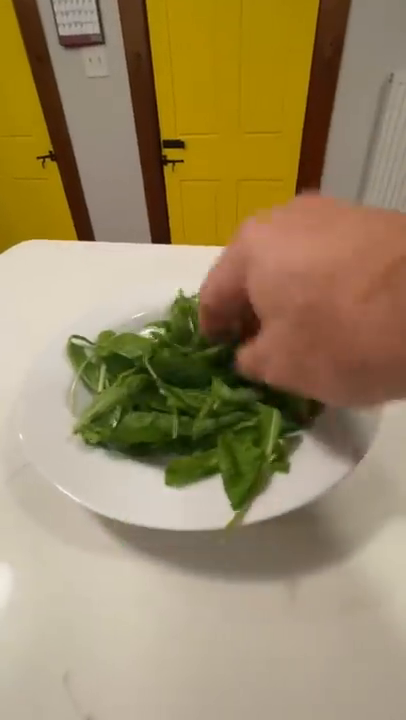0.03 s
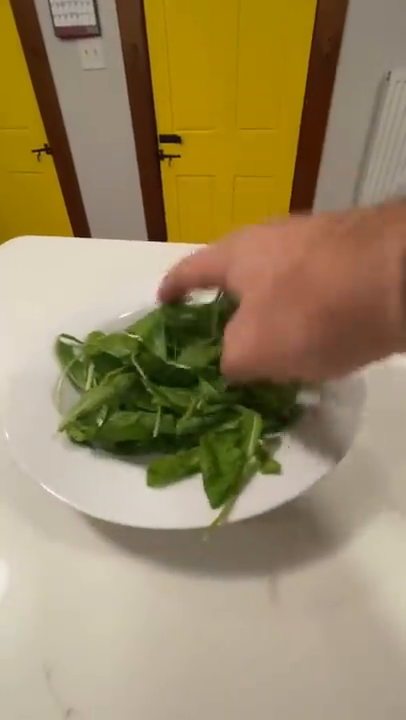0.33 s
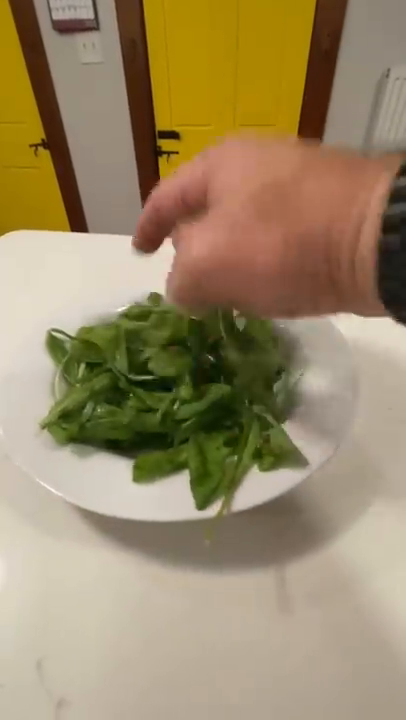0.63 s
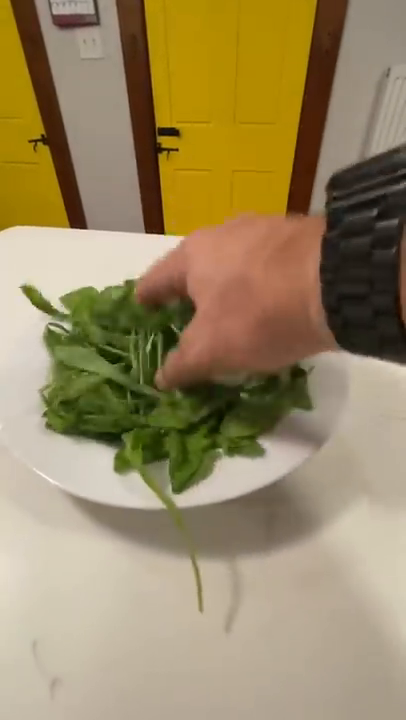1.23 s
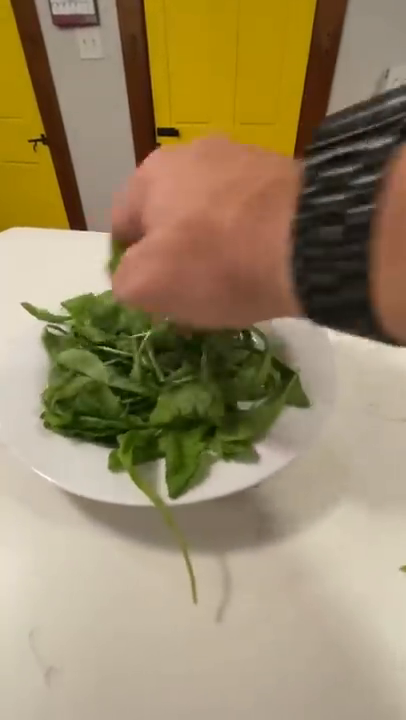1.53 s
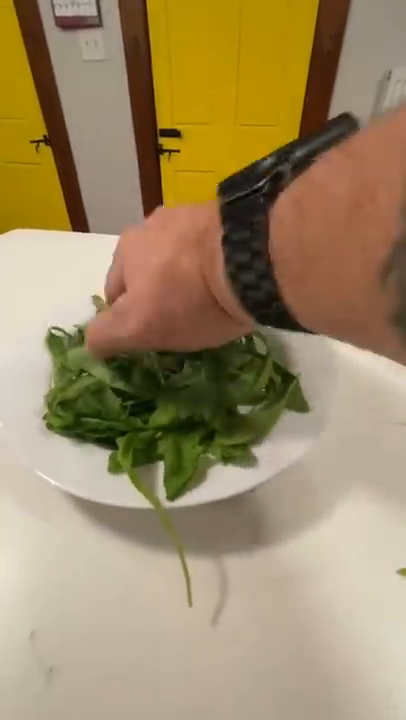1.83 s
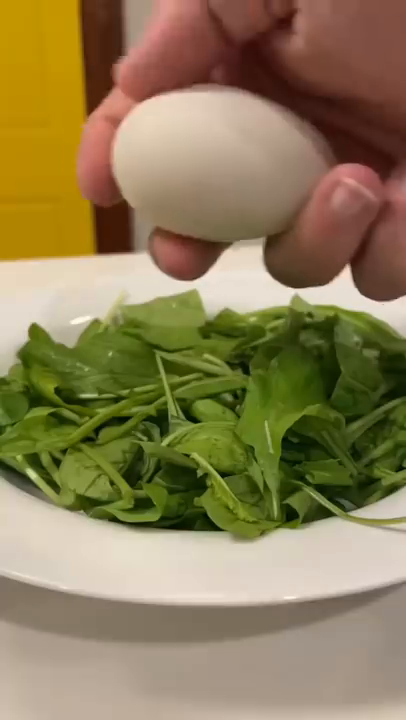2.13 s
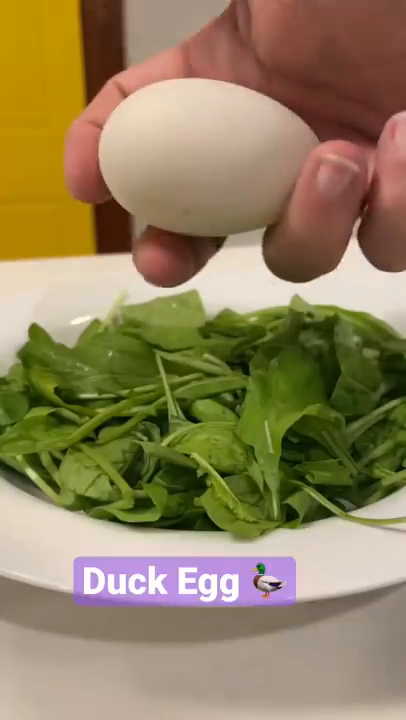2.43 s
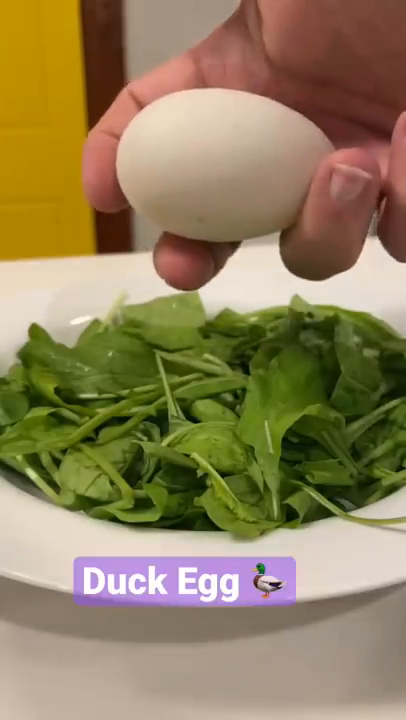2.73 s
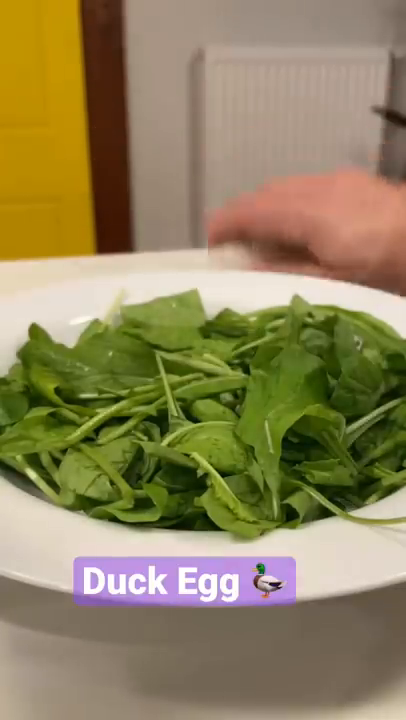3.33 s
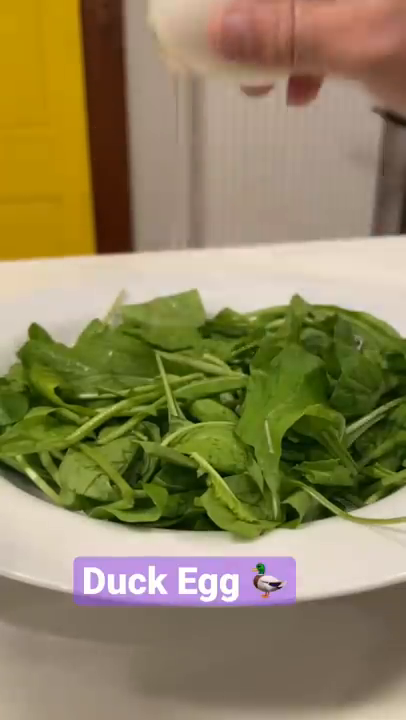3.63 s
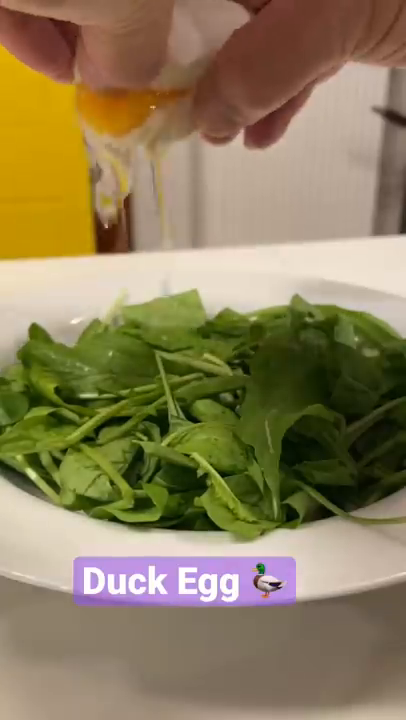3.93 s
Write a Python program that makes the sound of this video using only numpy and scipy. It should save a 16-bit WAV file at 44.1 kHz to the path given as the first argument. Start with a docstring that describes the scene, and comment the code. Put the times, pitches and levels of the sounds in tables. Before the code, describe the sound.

An egg is knocked twice on a table and its shell crackles open. Before that, salad leaves rustle softly and a china plate clinks faintly. Heard close up in a small, quiet room with a low hum.

```python
"""Two close scenes in a small, hard-walled, quiet room with a low hum. First a hand arranges salad leaves
on a china plate: they rustle in tiny slips, stalks snap, and the plate clinks twice. At 2.1 s the second
scene cuts in. An egg is knocked twice on the table top, each knock a crunch of shell, a tock of the egg
and a thump of the table. Then fingers pull the shell apart in a few crackles and the wet membrane pops."""
import sys
import numpy as np
from scipy import signal
from scipy.fft import rfft, irfft
from scipy.io import wavfile
from scipy.ndimage import uniform_filter1d

SR = 44100
rng = np.random.default_rng(int(sys.argv[2]) if len(sys.argv) > 2 else 0)


def generate_wav(signal):
    """Clip the signal to [-1, 1] and save it as 16-bit WAV at the path in sys.argv[1]."""
    frames = np.transpose(np.atleast_2d(signal))
    scaled = np.clip(frames, -1, 1) * 32767
    pcm = np.round(scaled).astype(np.int16)
    wavfile.write(sys.argv[1], SR, pcm)


N = 176400
CUT_S = 2.105  # the leaf scene ends abruptly here
SHELL_LOW_CUT_HZ = 255

# stereo width of the room: f/Hz, side against mid/dB
ROOM_WIDTH = [(70, -11.5), (200, -20), (400, -7.5), (700, 0.5), (1300, 0.5), (2400, -7), (4400, 0),
              (14000, -10.5)]
# egg meeting the table: t/s, thump level/dB, thump tilt/(dB/octave), crunch level/dB, crunch decay/s
KNOCKS = [(3.0767, -19, 0.5, -6, 0.0021), (3.2990, -17.5, 0.5, -7, 0.0021)]


def undb(db):
    """Decibels to gain."""
    return 10 ** (np.asarray(db) / 20)


def unit(x):
    """Scale to rms 1."""
    return x / np.sqrt(np.mean(x ** 2))


def over_hz(points, size=N):
    """Read a curve of (f/Hz, value) points at the bins of a transform of this size."""
    hz, value = np.array(sorted(points)).T
    return np.interp(np.log(np.arange(size // 2 + 1) * SR / size + 1), np.log(hz), value)


def band(spectrum, hz, centres):
    """The sound in the band around hz, crossfading into the neighbouring centres."""
    return irfft(spectrum * over_hz([(f, float(f == hz)) for f in centres]), N)


def colour(x, points):
    """Minimum-phase EQ of unit power with the given (f/Hz, level/dB) shape."""
    size = 2 * N
    cepstrum = irfft(np.log(unit(undb(over_hz(points, size)))))
    cepstrum[1:N] *= 2
    cepstrum[N + 1:] = 0
    return irfft(rfft(x, size) * np.exp(rfft(cepstrum)))[..., :N]


def high_pass(x, hz, order):
    """Roll off the lows below hz."""
    return signal.sosfilt(signal.butter(order, hz, "high", fs=SR, output="sos"), x)


def wander(per_s):
    """A slow modulator: random values joined by straight lines."""
    hold = max(int(SR / per_s), 1)
    return uniform_filter1d(rng.standard_normal(N)[np.arange(N) // hold], hold)


def grains(per_s, scatter_db):
    """Random tiny clicks, mostly small and a few large; rms 1."""
    clicks = (rng.random(N) < per_s / SR) * rng.choice([-1, 1], N)
    return unit(clicks * undb(scatter_db * np.minimum(rng.exponential(size=N), 6)))


def fractures(t, at, rise_s, decay_s):
    """A run of tiny breaks that swells and dies within milliseconds, spread evenly over frequency."""
    envelope = np.exp(-np.maximum((at - t) / rise_s, (t - at) / decay_s).clip(0, 60))
    spectrum = rfft(envelope * grains(per_s=22000, scatter_db=2))
    power = uniform_filter1d(np.abs(spectrum) ** 2, int(120 * N / SR))  # smoothed over 120 Hz
    burst = irfft(spectrum / np.sqrt(np.abs(power) + 1e-18), N) * envelope ** .1
    return .5 * burst * np.sqrt(np.sum(envelope ** 2) / (np.sum(burst ** 2) + 1e-18))


def ring(t, at, modes, tilt_db=0, pivot_hz=1000):
    """Decaying modes struck at one moment; a softer touch tilts them down, in dB per octave."""
    age = np.maximum(t - at, 0)
    return sum(undb(db + tilt_db * np.log2(hz / pivot_hz)) * np.sin(2 * np.pi * hz * age)
               * np.exp(-np.log(1000) * age / t60) for hz, db, t60 in modes)


def attack(t, at, contact_s):
    """A ring builds up for as long as the contact pushes."""
    return np.clip((t - at) / contact_s, 0, 1)


def room_response(t):
    """Reverb of the hard walls, as mid and side; each band dies at its own rate."""
    # decay of the room: f/Hz, t60/s
    decays = [(100, 1), (400, 0.58), (1200, 0.45), (3000, 0.63), (7000, 0.5), (14000, 0.35)]
    predelay_s, build_s = .0023, .0015
    centres = [hz for hz, _ in decays]
    noise = rfft(rng.standard_normal((2, N)))
    noise[1] *= undb(over_hz(ROOM_WIDTH))
    tail = sum(band(noise, hz, centres) * np.exp(-np.log(1000) * t / t60) for hz, t60 in decays)
    tail *= np.clip((t - predelay_s) / build_s, 0, 1)
    return tail / np.sqrt(np.sum(tail[0] ** 2))


def in_room(x, room, wet_db):
    """A centred sound and its reverb, as mid and side."""
    return np.array([x, 0 * x]) + undb(wet_db) * signal.fftconvolve(x[None], room, axes=1)[:, :N]


def room_tone(t, shape, noise_db, hum):
    """A bed of low steady noise and hum that reaches the left first, as mid and side."""
    lead_s, side_db = .00033, 1
    mid, side = colour(rng.standard_normal((2, N)), shape) * undb(noise_db)
    mid = mid + sum(np.sqrt(2) * undb(db) * np.sin(2 * np.pi * (hz * t + rng.random())) for hz, db in hum)
    left_lead = (np.interp(t + lead_s / 2, t, mid) - np.interp(t - lead_s / 2, t, mid)) / 2
    diffuse = irfft(rfft(side) * undb(side_db + over_hz(ROOM_WIDTH)), N)
    return np.array([mid, left_lead + diffuse])


def shifting_rub(x):
    """Each quarter octave swells and fades alone, as different leaves take up the rubbing."""
    depth_db = 3.2
    centres, spectrum = 1000 * 2 ** (np.arange(16) / 4), rfft(x)
    return sum(band(spectrum, hz, centres) * undb(depth_db * wander(per_s=35)) for hz in centres)


def stalk_snaps(t):
    """Single stalks break, each with a short bright tick."""
    # snaps: t/s, level/dB
    snaps = [(0.275, -39.5), (0.343, -47), (.652, -50), (1.131, -46), (1.611, -51), (1.854, -56),
             (2.026, -55)]
    # tone of a snap: f/Hz, relative level/dB
    snap_eq = [(1000, -26), (5000, -9), (9000, 0), (13000, 0), (16000, -9)]
    return colour(sum(undb(db) * fractures(t, at, rise_s=.0002, decay_s=.0008) for at, db in snaps), snap_eq)


def leaves(t, room):
    """Leaves slide over each other in dense slips and crisper crinkles, and stalks snap; mid and side."""
    # the hand working in the leaves: t/s, relative level/dB
    gesture = [(0.0, -53.5), (0.03, -49.5), (0.2, -66.5), (0.21, -62), (0.26, -67), (0.28, -68),
               (0.28, -69), (0.33, -77), (0.35, -56.5), (0.44, -45), (0.6, -73.5), (0.69, -69), (0.7, -60),
               (0.76, -59.5), (0.83, -52.5), (0.85, -45), (0.94, -56), (1.04, -56.5), (1.07, -62.5),
               (1.12, -58.5), (1.13, -51), (1.21, -63.5), (1.29, -54), (1.3, -59.5), (1.37, -55),
               (1.47, -69.5), (1.74, -68.5), (1.82, -55), (1.89, -52.5), (1.93, -69), (2.01, -76),
               (2.05, -51), (2.09, -62)]
    # tone of the rustle: f/Hz, relative level/dB
    leaf_eq = [(400, -4), (750, -4.5), (1100, -7), (1500, -13.5), (2100, -8.5), (2900, -12), (3700, -7.5),
               (5400, -10), (6600, -3), (7500, -8.5), (9000, 1.5), (10500, -3), (12500, -6.5), (13800, -16),
               (14700, -26), (16000, -39)]
    # stereo width of the rustle: f/Hz, side against mid/dB
    width = [(1000, 3), (2100, 5), (3200, 6), (7000, -12), (11000, -59), (14000, -41)]
    gain_db, flutter_db, crinkle_db = 2, .7, -12
    effort = undb(gain_db + np.interp(t, *np.array(gesture).T) + flutter_db * wander(per_s=48))
    slips = np.array([grains(per_s=14000, scatter_db=3) + undb(crinkle_db) * grains(per_s=160, scatter_db=3)
                      for _ in range(2)])
    mid, side = colour(effort * shifting_rub(slips), leaf_eq)
    rustle = in_room(mid + stalk_snaps(t), room, wet_db=-6.5)
    rustle[1] += irfft(rfft(side) * undb(over_hz(width)), N)
    return rustle


def plate_clinks(t):
    """The china rings when touched: dull the first time, bright the second."""
    # modes of the plate: f/Hz, relative level/dB, t60/s
    modes = [(2040, 0, .25), (2085, -8, .09), (3375, 2, .12), (3440, -8, .07), (4533, -3, .28),
             (5190, -4, .05), (5556, -9, .36), (6342, -12, .2), (6616, 1, .08)]
    # touches on the plate: t/s, level/dB, tilt/(dB/octave)
    touches = [(.408, -48, -9), (1.131, -44.5, 1.5), (1.146, -74, 3)]
    return sum(undb(db) * ring(t, at, modes, tilt, pivot_hz=modes[0][0]) * attack(t, at, contact_s=.0007)
               for at, db, tilt in touches)


def table_thumps(t):
    """The table top takes each blow and rings low."""
    # modes of the table top: f/Hz, relative level/dB, t60/s
    modes = [(69.3, -18, 0.62), (84.5, -8.5, 0.22), (162.4, -10.5, 0.17), (192, 3, 0.05),
             (218.7, -22, 0.47), (247.5, -15.5, 0.3), (310, -16.5, 0.21), (415, -20, 0.15), (678, -29, 0.3),
             (1460, -25, 0.2)]
    late = t - .0019  # the shell caves in before the egg's weight meets the table
    return sum(undb(db) * ring(late, at, modes, tilt, pivot_hz=200) * attack(late, at, contact_s=.0025)
               for at, db, tilt, _, _ in KNOCKS)


def egg_tocks(t):
    """The egg rings briefly at each knock: whole it tocks hollowly, dented it thuds and rattles."""
    # modes of the whole egg, then of the dented egg: f/Hz, level/dB, t60/s
    egg_modes = [
        [(660, -28.5, 0.081), (1015, -27.5, 0.027), (1360, -18.5, 0.042), (1773, -20.5, .019), (2020, -39, .08),
         (2885, -41, 0.29)],
        [(375, -26.5, 0.037), (420, -25.5, 0.041), (498, -25.5, 0.059), (1292, -25.5, 0.05), (1985, -25, 0.048),
         (2240, -20, 0.016), (3170, -32, 0.063), (3360, -24.5, 0.052), (3625, -17, 0.0275)],
    ]
    return sum(ring(t, at, modes) * attack(t, at, contact_s=.0006)
               for (at, *_), modes in zip(KNOCKS, egg_modes))


def shell_crunches(t):
    """The shell caves in where it meets the table."""
    # tone of the whole shell, then of the dented shell: f/Hz, relative level/dB
    crunch_eqs = [
        [(200, -5.5), (500, -7), (680, -4), (1100, -6), (1900, -5.5), (2400, -12), (2850, -16), (3600, -18),
         (4350, -22.5), (5300, -14), (7000, -15), (8700, -11.5), (10000, -32), (11600, -15), (13000, -20),
         (15000, -38), (16500, -40)],
        [(200, -4), (460, -1.5), (620, -17.5), (850, -4.5), (1300, -6.5), (1650, -6.5), (2200, -5),
         (2650, -7.5), (3300, -3), (3600, -8.5), (3950, -17.5), (4700, -17), (6400, -13.5), (8500, -15.5),
         (10000, -28.5), (12800, -13.5), (15000, -29), (16500, -46)],
    ]
    crunch = sum(colour(undb(db) * fractures(t, at, rise_s=.00042, decay_s=decay), eq)
                 for (at, _, _, db, decay), eq in zip(KNOCKS, crunch_eqs))
    return high_pass(crunch, SHELL_LOW_CUT_HZ, order=3)


def finger_squeeze(t):
    """Fingers work into the wet shell with a soft, grainy squelch."""
    # pressure of the fingers: t/s, level/dB
    gesture = [(3.72, -66), (3.78, -49.5), (3.86, -55.5), (3.95, -54.5), (4.0, -52)]
    # tone of the squelch: f/Hz, relative level/dB
    squelch_eq = [(59, 5.5), (100, 9.5), (962, -3), (2580, -24), (3110, -10.5), (8520, -21), (9660, -68),
                  (12400, -18), (15000, -43)]
    pressure = undb(np.interp(t, *np.array(gesture).T)) * (t > gesture[0][0])
    return colour(grains(per_s=1500, scatter_db=3.2) * pressure, squelch_eq)


def membrane_pops(t):
    """The wet membrane pops in tiny pitched blips."""
    # pops: t/s, level/dB, f/Hz
    pops = [(3.936, -47.5, 3200), (3.94, -53, 1550), (3.963, -49, 3500), (3.968, -50.5, 1930),
            (3.977, -51, 1370)]
    t60_s = .014
    return sum(ring(t, at, [(hz, db, t60_s)]) for at, db, hz in pops)


def shell_cracks(t):
    """The shell gives way under the fingers in short crackles that set the broken pieces ringing."""
    # one crack at each knock, then a run as the shell opens: t/s, level/dB, rise/s, decay/s
    cracks = [(3.07, -37, 0.0016, 0.0033), (3.292, -31, 0.00073, 0.00067), (3.743, -57, 0.0026, 0.018),
              (3.78, -27.5, 0.0022, 0.003), (3.7814, -18.5, 0.00041, 0.0012), (3.787, -31, 0.00063, 0.0023),
              (3.8053, -21, 0.000058, 0.0017), (3.82, -37, 0.00039, 0.0022),
              (3.8277, -15.5, 0.00033, 0.0018)]
    # tone of the splitting shell: f/Hz, relative level/dB
    shell_eq = [(200, -2), (500, -8.5), (800, 1.5), (1350, -14.5), (1900, -6), (3000, -8.5), (4300, -6.5),
                (5700, -13.5), (7000, -4), (9000, -1.5), (10500, 1), (12500, -9), (15200, -11.5),
                (16500, -34)]
    # resonances of the broken shell: f/Hz, width/Hz, gain/dB
    peaks = [(690, 80, -6), (2040, 120, -3), (4300, 470, 6), (5080, 310, 10), (6000, 250, 1)]
    bursts = sum(undb(db) * fractures(t, at, rise, decay) for at, db, rise, decay in cracks)
    crackle = colour(bursts, shell_eq)
    ringing = sum(undb(db) * signal.lfilter(*signal.iirpeak(hz, hz / width, fs=SR), crackle)
                  for hz, width, db in peaks)
    return high_pass(crackle + ringing, SHELL_LOW_CUT_HZ, order=3)


def scene():
    """The leaf scene cuts to the egg scene, each over its own room tone; left and right."""
    # room tone under the leaves: f/Hz, relative level/dB
    leaf_bed = [(30, -47), (45, 10), (87, -5.5), (120, 6), (150, -2), (250, 2), (500, -4.5), (720, -7.5),
                (1000, -13), (1500, -19.5), (3000, -27.5), (8000, -37.5), (16000, -49)]
    # room tone under the egg: f/Hz, relative level/dB
    egg_bed = [(30, -23), (45, -10), (70, -6), (90, -12), (130, -8), (250, -3), (400, -6), (600, -9),
               (850, -17), (1200, -28), (2700, -34), (4200, -43), (8000, -44), (13000, -44), (16000, -58)]
    # hum: f/Hz, level under the leaves/dB, level under the egg/dB
    hum_lines = [(56.3, -58, -61.5), (121.2, -61.5, -71)]
    t, hum = np.arange(N) / SR, np.array(hum_lines)
    room = room_response(t)
    salad = (leaves(t, room)
             + in_room(plate_clinks(t), room, wet_db=-12)
             + room_tone(t, leaf_bed, noise_db=-54, hum=hum[:, [0, 1]]))
    egg = (in_room(table_thumps(t), room, wet_db=-16)
           + in_room(shell_crunches(t), room, wet_db=-5)
           + in_room(egg_tocks(t), room, wet_db=-15)
           + in_room(shell_cracks(t) + finger_squeeze(t) + membrane_pops(t), room, wet_db=-14)
           + room_tone(t, egg_bed, noise_db=-60, hum=hum[:, [0, 2]]))
    mid, side = np.where(t < CUT_S, salad, egg)
    return np.array([mid + side, mid - side])


def record(dry):
    """A close phone: its two microphone ports fall out of phase up high; it cuts the rumble and the top."""
    # phase between the ports: f/Hz, phase/rad
    port_phase = [(100, 0), (400, -.15), (600, -.5), (1000, -.1), (2500, .4), (4000, .7), (5500, .9),
                  (7500, 1.6), (9000, 2.5), (10200, 3.14), (11200, 3.9), (12500, 4.9), (14000, 6.1)]
    # left-right balance of the sound, low mids leaning right: f/Hz, left minus right/dB
    stereo_balance = [(100, 1), (200, -1), (380, -4), (700, 1.5), (2400, 1), (15000, 0.5)]
    low_cut_hz, top_hz = 61.2, 16700
    half_phase, half_db = over_hz(port_phase) / 2, over_hz(stereo_balance) / 2
    mid, side = rfft(dry[0] + dry[1]) / 2, rfft(dry[0] - dry[1]) / 2
    mid, side = mid * np.cos(half_phase), side + 1j * mid * np.sin(half_phase)
    stereo = irfft(np.array([mid + side, mid - side]) * undb([half_db, -half_db]), N)
    top_cut = signal.ellip(8, .2, 70, top_hz, fs=SR, output="sos")
    return signal.sosfilt(top_cut, high_pass(stereo, low_cut_hz, order=4))


dry = scene()
out = record(dry)
generate_wav(out)
```